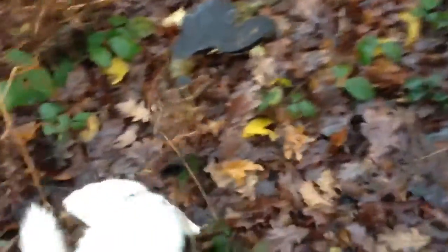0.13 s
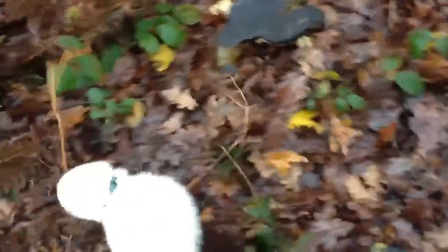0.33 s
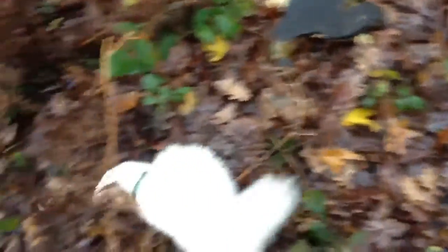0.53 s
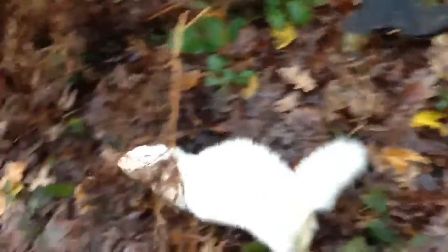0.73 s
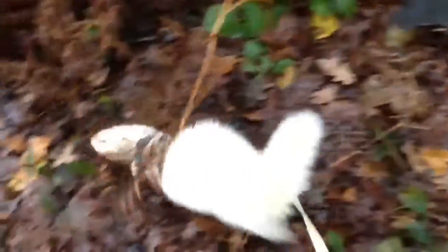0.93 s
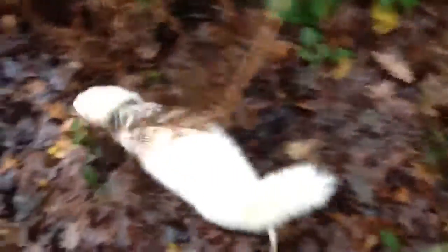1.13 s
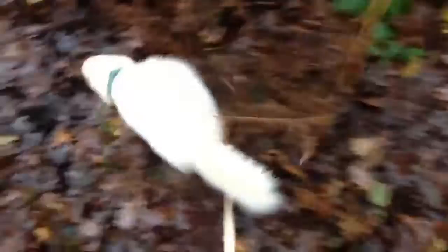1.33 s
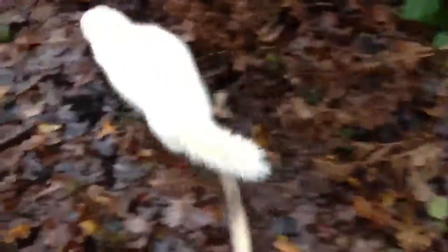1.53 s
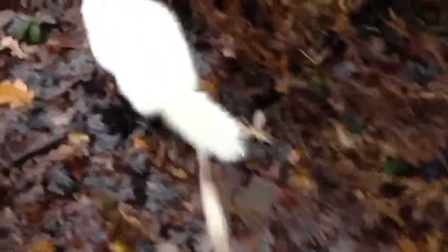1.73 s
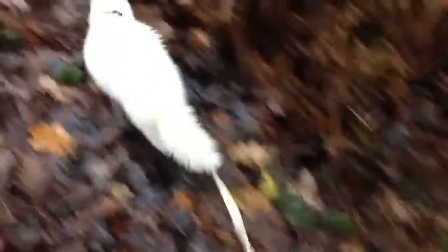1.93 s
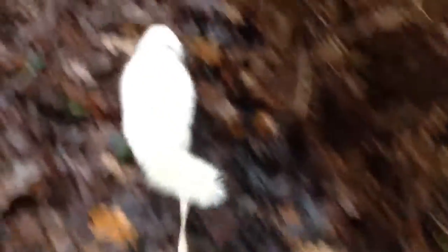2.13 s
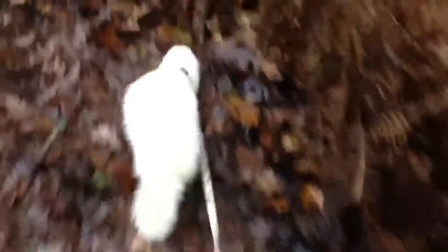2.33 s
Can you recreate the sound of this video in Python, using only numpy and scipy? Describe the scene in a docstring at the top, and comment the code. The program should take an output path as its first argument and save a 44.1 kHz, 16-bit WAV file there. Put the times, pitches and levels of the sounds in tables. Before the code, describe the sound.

Wind buffets a hand-held phone microphone: dense low thuds and slaps until 0.25 s, a brief lull, a hard gust around 0.5-0.65 s, then softer uneven rumbling, with a thump near 1.7 s, nearly gone after 2 s. Beneath it a small dog's paws crackle faintly through leaves, with a sharp snap at 1.86 s, a dull scuff near 2 s and clearer rustles to the end. Faint steady woodland hiss.

```python
"""Gusty wind buffets the microphone port of a hand-held phone while a small dog trots through dead leaves in a wood.
Wind: filtered noise in three eddy sizes, with low tone bursts for thuds and bell-shaped pulses for slaps.
Leaves: coloured noise and short decaying sines for the rustle, damped bursts for faint snaps, noise for a scuff.
The wood far off is a steady coloured noise: a hiss."""
import sys
import numpy as np
from scipy import signal
from scipy.fft import rfft, irfft, next_fast_len
from scipy.io import wavfile
from scipy.ndimage import uniform_filter1d, map_coordinates

SR = 44100
rng = np.random.default_rng(int(sys.argv[2]) if len(sys.argv) > 2 else 0)


def convert_level_to_amplitude(level_db):
    """Map a level in decibels to its linear amplitude factor."""
    exponent = np.asarray(level_db, float) / 20
    return 10 ** exponent


def inscribe(sig):
    """Save sig as 16-bit PCM at rate SR to the path in sys.argv[1].

    A 1-D sig is mono; a 2-D sig holds one channel per row.
    Samples are clipped to [-1, 1] before scaling.
    """
    pcm = np.round(np.clip(np.atleast_2d(sig).T, -1, 1) * 32767)
    wavfile.write(sys.argv[1], SR, pcm.astype(np.int16))


N = 104472  # length in samples


def unit(x):
    """Normalisation: scaled to rms 1."""
    return x / np.sqrt(np.mean(x ** 2) + 1e-20)


def curves(rows):
    """Linear interpolation: one value per sample for each column after the time."""
    s, *columns = np.transpose(rows)
    t = np.arange(N) / SR
    return [np.interp(t, s, column) for column in columns]


def wobble(rate):
    """Band-limited modulation: a smooth random curve through rate knots a second."""
    knots = rng.standard_normal(400)
    return map_coordinates(knots, [np.arange(N) * np.clip(rate, .1, 150) / SR])


def coloured(x, spectrum):
    """Spectral shaping: x filtered through (f/Hz, gain/dB) points on a log axis, then set to rms 1."""
    m = next_fast_len(N + 8192)
    f, db = np.transpose(spectrum)
    bins_hz = np.fft.rfftfreq(m, 1 / SR)
    gain = convert_level_to_amplitude(np.interp(np.log(bins_hz + 1), np.log(f + 1), db))
    return unit(irfft(rfft(x, m) * gain, m)[:N])


def highpass(x, hz, order):
    """Causal Butterworth low cut."""
    return signal.sosfilt(signal.butter(order, hz, "high", fs=SR, output="sos"), x)


def scatter(starts_s, shapes, lead=0):
    """Superposition of short shapes, one row each, begun lead samples before their times."""
    at = np.round(starts_s * SR).astype(int)[:, None] + np.arange(shapes.shape[1])
    return np.bincount(at.ravel(), shapes.ravel(), N + shapes.shape[1] + SR)[lead:N + lead]


def wind():
    """Turbulence at three scales: a slow deep surge, saturating big eddies and flickering small ones."""
    # wind strength on the port between thuds: t/s, level/dB
    strength = [(0, -34), (.15, -23), (.19, -38), (.25, -39), (.41, -34), (.435, -47), (.5, -24),
                (.58, -30), (.64, -34.5), (1.1, -33), (1.4, -41.5), (1.85, -39.5), (2.0, -50),
                (2.37, -50.5)]
    # small eddies relative to that strength: t/s, level/dB
    small_share = [(0, -20), (.07, 0.5), (.16, -8.5), (.23, 9), (.35, -21.5), (.46, -14), (.56, -2.5),
                   (.66, -9), (1.13, -17), (1.8, -9), (2.0, -32), (2.37, -11)]
    # relative noise spectra of the eddies, each: f/Hz, gain/dB
    deep_spectrum = [(20, -50), (40, -16.5), (70, 0.5), (110, 13), (140, 6), (200, -50.5)]
    big_spectrum = [(53, -45), (90, -19), (138, -0.5), (172, -1), (382, -18.5), (433, -30.5), (681, -47.5),
                    (900, -57), (1980, -120)]
    small_spectrum = [(150, -23), (300, 7.5), (500, -2.5), (800, -18), (1300, -21), (2200, -42.5),
                      (4000, -80.5)]
    deep_db, deep_smooth_s = -10.5, 0.4
    lump_db, lumps_per_s = 3, 70
    flicker_db, flickers_per_s = 4.5, 90
    steady = 0.4  # envelope offset; the smaller it is, the more even the rocking
    big_band_hz = [64.4, 593]

    (strength_db,), (small_db,) = curves(strength), curves(small_share)
    slow_db = uniform_filter1d(strength_db, int(deep_smooth_s * SR))
    deep = convert_level_to_amplitude(slow_db + deep_db) * coloured(rng.standard_normal(N), deep_spectrum)

    # dividing by the envelope evens out the size of the swings
    rock = signal.hilbert(coloured(rng.standard_normal(N), big_spectrum), next_fast_len(N))[:N]
    rock = unit(rock.real / (abs(rock) + steady))
    lumpy = convert_level_to_amplitude(strength_db + lump_db * wobble(lumps_per_s)) * rock
    big = signal.sosfilt(signal.butter(3, big_band_hz, "band", fs=SR, output="sos"), lumpy)

    flicker = convert_level_to_amplitude(flicker_db * wobble(flickers_per_s))
    small = coloured(flicker * rng.standard_normal(N), small_spectrum)
    return deep + big + convert_level_to_amplitude(strength_db + small_db) * small


def rustle():
    """Friction noise of dragged leaves plus a random train of tiny damped cracks; both follow the paws."""
    # paws stirring the leaves, before the contrast is narrowed: t/s, level/dB
    stirring = [(0.0, -58), (0.34, -54.5), (0.41, -46.5), (0.43, -52), (0.52, -54), (0.57, -50.5),
                (0.63, -58), (0.68, -55), (0.72, -53), (0.78, -57), (0.82, -48.5), (0.84, -58), (1.0, -53),
                (1.04, -55), (1.11, -51), (1.2, -58), (1.24, -49.5), (1.28, -57), (1.34, -51), (1.6, -53.5),
                (1.68, -50.5), (1.78, -56), (1.85, -55), (1.89, -56.5), (1.94, -51.5), (1.97, -54.5),
                (2.01, -44.5), (2.21, -51), (2.25, -43.5), (2.37, -50)]
    # relative spectrum of the swish: f/Hz, gain/dB
    leaf_spectrum = [(500, -10), (800, 1.5), (1150, -5.5), (1500, -4), (3000, -8.5), (4600, -7), (8500, -8),
                     (11000, -14.5), (15000, -10)]
    contrast = 0.89  # of the level about its mean
    swish_db, waver_db, wavers_per_s = -6, 3, 41.53
    crackle_db, cracks_per_s, size_db = -10, 1600, 2  # size_db: mean of an exponential spread
    middle_hz, pitch_spread, decay_cycles = 6550, 0.77, 0.98

    level_db, = curves(stirring)
    level_db = level_db.mean() + contrast * (level_db - level_db.mean())

    # columns: chance of sounding, pitch, size, time
    draws = rng.random((6000, 4))
    draws = draws[draws[:, 0] < cracks_per_s * N / SR / len(draws)]
    pitch = draws[:, 1:2]
    log_odds = np.log(pitch / (1 - pitch))
    hz = np.clip(middle_hz * np.exp(pitch_spread * log_odds / 2), 800, 15000)
    size = convert_level_to_amplitude(-size_db * np.log(draws[:, 2:3]))
    t = np.arange(160) / SR
    grains = size * np.sin(2 * np.pi * hz * t) * np.exp(-t * hz / decay_cycles)
    crackle = unit(scatter(draws[:, 3] * N / SR, grains))

    swish = coloured(rng.standard_normal(N), leaf_spectrum) * convert_level_to_amplitude(waver_db * wobble(wavers_per_s))
    return convert_level_to_amplitude(level_db) * (convert_level_to_amplitude(crackle_db) * crackle + convert_level_to_amplitude(swish_db) * swish)


def wood():
    """Diffuse broadband noise: the smooth far hiss of the trees, its level drifting slightly."""
    # relative spectrum of the hiss: f/Hz, gain/dB
    hiss_spectrum = [(240, -34), (400, -2.5), (636, -6.5), (949, -4), (2630, -21), (4310, -20.5),
                     (5110, -39), (14600, -62), (15300, -32), (16000, -50)]
    level_db = -60 + 0.42 * wobble(8.6)
    return convert_level_to_amplitude(level_db) * coloured(rng.standard_normal(N), hiss_spectrum)


def thuds():
    """Gaussian tone bursts: big eddies thud as a couple of low cycles with a brighter edge near the crest."""
    # big eddies on the port, level of the low burst's envelope peak: t/s, level/dB
    crests = [(0.013, -19), (0.029, -22), (0.059, -20), (0.077, -15.5), (.09, -19), (.103, -18),
              (.127, -23), (0.138, -24), (.153, -11), (0.166, -16), (0.201, -16.5), (.21, -15), (.228, -13),
              (.257, -22.5), (0.271, -25), (0.301, -25.5), (0.331, -23), (0.391, -23), (0.457, -16),
              (0.471, -21.5), (.495, -11.5), (0.518, -14), (0.537, -7.5), (0.553, -14.5), (.567, -20),
              (0.579, -20), (0.617, -17.5), (0.653, -15), (.699, -20), (.735, -22), (0.745, -23),
              (0.766, -22.5), (.801, -26), (.821, -19), (0.856, -16.5), (0.873, -16.5), (0.899, -20),
              (0.942, -20.5), (.989, -19), (1.008, -23.5), (1.05, -18), (1.077, -19), (1.092, -19.5),
              (1.138, -15), (1.178, -27.5), (1.196, -23.5), (1.246, -35), (1.301, -33), (1.331, -26),
              (1.406, -25), (1.482, -22.5), (1.514, -29), (1.551, -27), (1.617, -22), (1.664, -22),
              (1.698, -13.5), (1.759, -29.5), (1.775, -21.5), (1.791, -22), (1.815, -28.5), (1.889, -37),
              (2.019, -22), (2.055, -36), (2.11, -34.5), (2.147, -37.5), (2.217, -33.5), (2.245, -28.5),
              (2.271, -30), (2.292, -31.5), (2.327, -31)]
    thud_hz, hz_per_db, spread = 182.6, 2.5, 0.11  # pitch at -18.5 dB; harder thuds sit higher
    thud_s, edge_s = 0.0035, 0.00322  # standard deviations of the envelopes
    edge_ratio, edge_db = 1.74, -12.5  # pitch and level against the low burst

    def burst(hz, t, length_s, phase):
        """Gaussian envelope on a cosine carrier."""
        return np.exp(-(t / length_s) ** 2 / 2) * np.cos(2 * np.pi * hz * t + 10 * phase)

    s, db = (c[:, None] for c in np.transpose(crests))
    # one column each: pitch, phase, edge phase, edge pitch, edge delay
    d = rng.standard_normal((len(s), 5))
    t = np.arange(-SR // 40, SR // 40) / SR
    hz = (thud_hz + hz_per_db * (db + 18.5)) * np.exp(spread * d[:, :1])
    low = burst(hz, t, thud_s, d[:, 1:2])
    edge_hz = edge_ratio * hz * np.exp(spread * d[:, 3:4])
    edge = convert_level_to_amplitude(edge_db) * burst(edge_hz, t - .5 * edge_s * d[:, 4:], edge_s, d[:, 2:3])
    return scatter(s[:, 0], convert_level_to_amplitude(db) * (low + edge), lead=SR // 40)


def slaps():
    """Pressure pulses: each small eddy is a brief Lorentzian push of random sign, its lows cut away."""
    # small eddies slapping the port (peak level; half-width before the low cut): t/s, level/dB, half-width/ms
    pulses = [(0.023, -20.5, 0.94), (.0614, -11.5, 0.59), (0.076, -11, 0.74), (.091, -17.5, 0.67),
              (0.101, -12, 0.81), (0.1114, -16.5, 0.42), (.127, -21, .4), (0.132, -14, 0.29),
              (.1497, -11.5, 0.77), (0.164, -17, 0.95), (0.204, -30, .6), (.2195, -14.5, 0.82),
              (0.2256, -9, 0.34), (0.4633, -23.5, 0.98), (.493, -20.5, 0.47), (0.5191, -20, 0.33),
              (0.5337, -14, 0.75), (0.545, -15.5, 1), (0.5526, -13, 1), (0.556, -23.5, 0.34),
              (0.6461, -22, 0.93), (0.6505, -19.5, 0.91), (.8211, -28, 1), (1.611, -27.5, 1),
              (1.6975, -26.5, 1), (1.9807, -43, .2), (2.0167, -21, 0.69), (2.213, -34, 1)]
    s, db, width_ms = (c[:, None] for c in np.transpose(pulses))
    lead = SR // 50
    u = np.arange(-lead, lead) / SR / (width_ms / 1000)
    pushes = highpass(1 / (1 + u ** 2), 330, order=3)
    pushes = pushes / abs(pushes).max(1, keepdims=True)
    sign = rng.choice([-1, 1], s.shape)
    return scatter(s[:, 0], convert_level_to_amplitude(db) * sign * pushes, lead=lead)


def snaps():
    """Damped fracture: each break is a broad crack, a very short ring and a dull tap under one decay."""
    # leaves and twigs snapping, level before rise and low cut: t/s, level/dB, ring f/Hz
    breaks = [(.1203, -40, 7160), (0.2638, -40, 4400), (0.4204, -33, 4540), (0.5345, -36, 8200),
              (0.5363, -36.5, 6100), (.5719, -43.5, 7200), (.6579, -33.5, 9650), (.8168, -45, 7400),
              (0.8287, -42, 7000), (.8766, -38.5, 4700), (1.1203, -38.5, 3780), (1.2285, -39, 7730),
              (1.4235, -44, 8500), (1.4916, -38, 4400), (1.648, -36.5, 6330), (1.805, -33.5, 6160),
              (1.8412, -46, 4940), (1.846, -46, 4600), (1.8585, -20, 8400), (1.8612, -29, 8400),
              (1.8643, -37, 6240), (1.936, -43, 6900), (1.9401, -33.5, 4470), (2.075, -32.5, 11500),
              (2.2462, -73, 5800), (2.2505, -46, 6400), (2.3, -32, 4250), (2.3614, -40.5, 7280)]
    t60_s, rise_s = 0.0047, 0.00023
    crack_db, ring_db, low_cut_hz = -2, -1, 2660
    tap_db, tap_hz = -15.5, 1300

    s, db, hz = (c[:, None] for c in np.transpose(breaks))
    t = np.arange(SR // 40) / SR
    shape = convert_level_to_amplitude(db - 60 * t / t60_s) * (1 - np.exp(-t / rise_s))
    crack = convert_level_to_amplitude(crack_db) * rng.standard_normal((len(s), len(t)))
    ring = convert_level_to_amplitude(ring_db) * np.sin(2 * np.pi * hz * t)
    tap = convert_level_to_amplitude(tap_db) * np.sin(2 * np.pi * tap_hz * t)
    bright = highpass(crack + ring, low_cut_hz, order=1)
    return scatter(s[:, 0], shape * (bright + tap))


def scuff():
    """Friction noise under a half-sine swell: a dull, uneven scrape of a paw low through damp leaves."""
    # scrapes, level at the top of the swell: start t/s, length/s, level/dB
    scrapes = [(1.93, 0.13, -51.5)]
    # relative spectrum of the scrape: f/Hz, gain/dB
    scrape_spectrum = [(300, -25), (600, 3), (900, -5), (1400, -9), (2500, -39)]
    t = np.arange(N) / SR
    swell = np.zeros(N)
    for start_s, length_s, db in scrapes:
        swell += convert_level_to_amplitude(db) * np.sin(np.pi * np.clip((t - start_s) / length_s, 0, 1))
    uneven = convert_level_to_amplitude(1.3 * wobble(66)) * rng.standard_normal(N)
    return swell * coloured(uneven, scrape_spectrum)


def scene():
    """Linear superposition of wind, leaves and wood on one microphone."""
    wind_on_port = wind() + thuds() + slaps()
    leaves = rustle() + snaps() + scuff()
    return (wind_on_port + leaves + wood())[None]


def band_limit(x):
    """A steep low-pass at the top of the band."""
    return signal.sosfilt(signal.butter(12, 16540, fs=SR, output="sos"), x)


def record(dry):
    """Band limitation: the phone's steep low-pass at 15300 Hz."""
    dull = signal.sosfilt(signal.butter(12, 15300, fs=SR, output="sos"), dry)
    return band_limit(dull)


dry = scene()
out = record(dry)
inscribe(out)
```